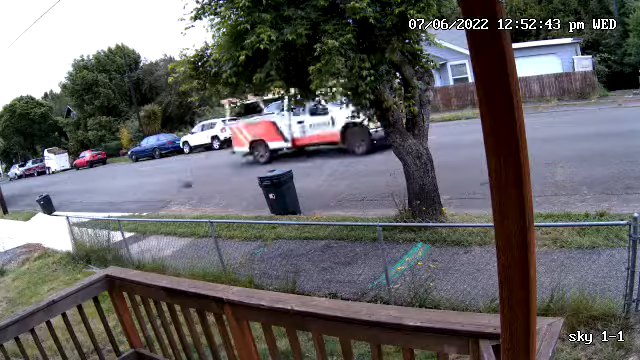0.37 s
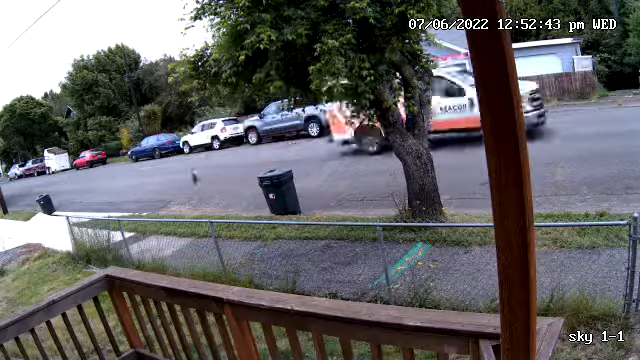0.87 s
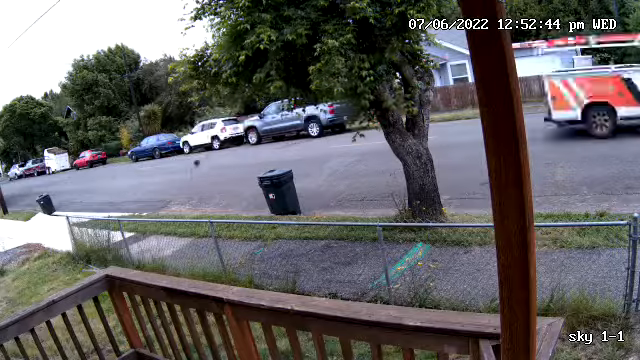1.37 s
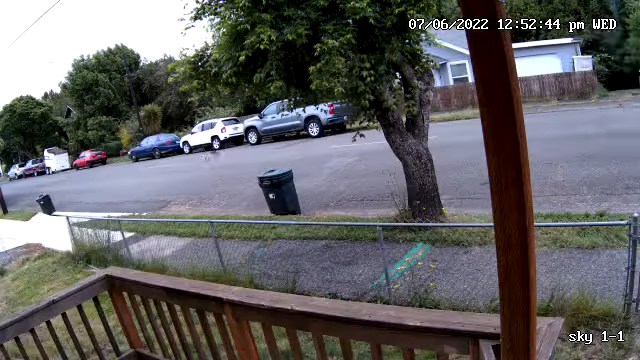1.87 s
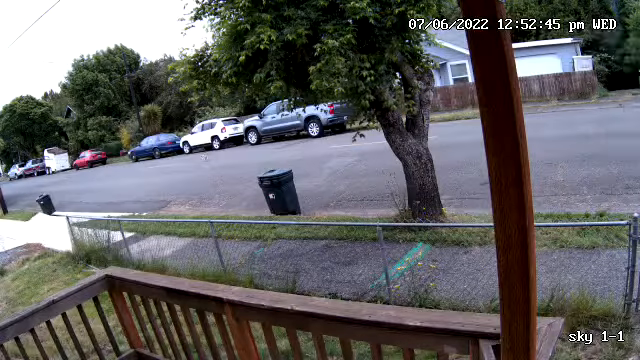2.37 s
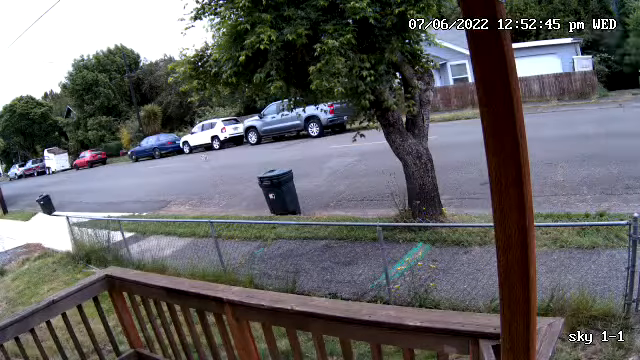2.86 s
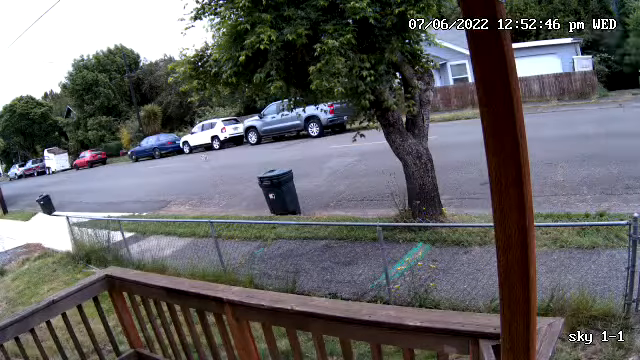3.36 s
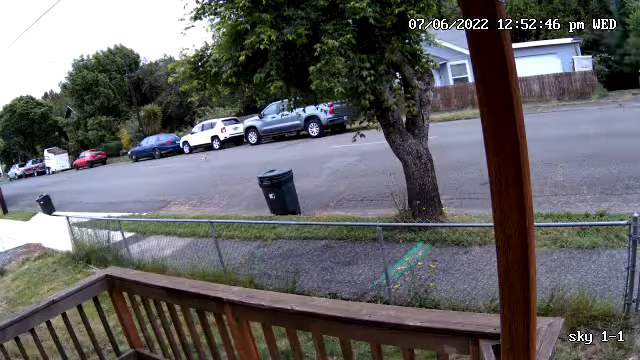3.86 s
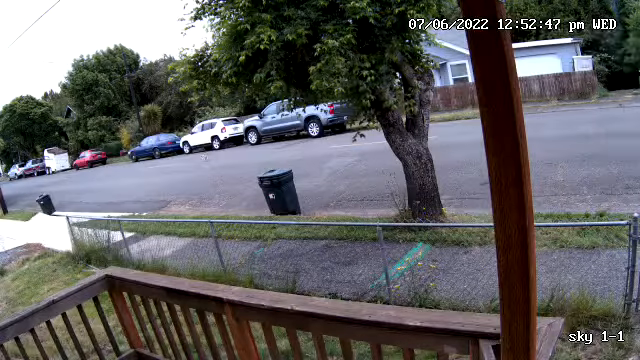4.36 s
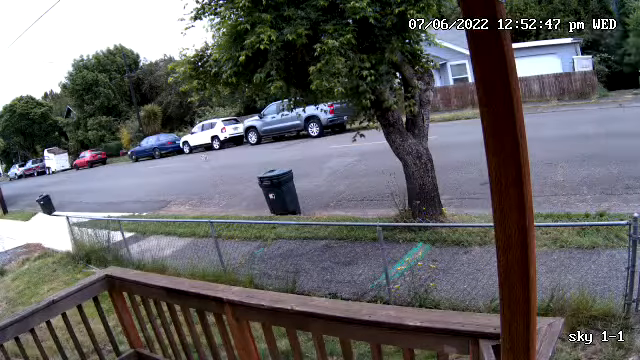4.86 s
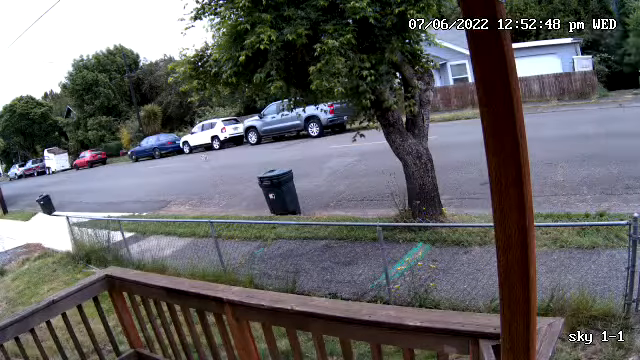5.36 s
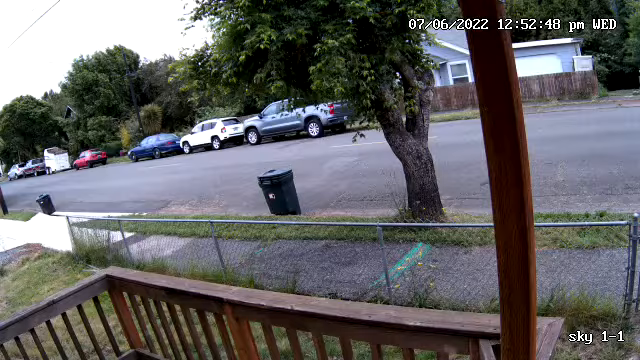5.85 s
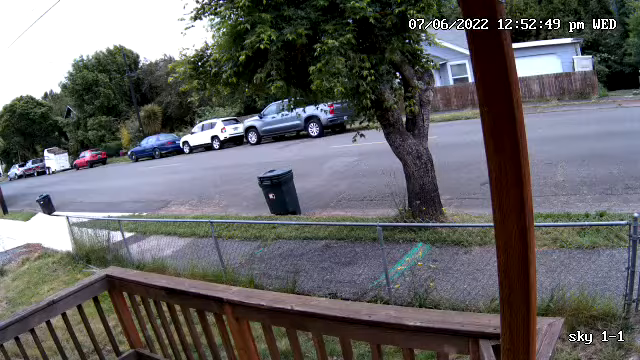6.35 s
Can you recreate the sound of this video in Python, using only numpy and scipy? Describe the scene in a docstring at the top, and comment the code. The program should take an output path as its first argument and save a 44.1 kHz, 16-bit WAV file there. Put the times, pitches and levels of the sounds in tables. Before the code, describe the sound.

Heard from a porch through a small microphone with limited treble: a loaded pickup already close, its tyres making a hollow, fluttering roar with airy hiss over a low engine throb. Light metallic rattles come first, then soft bassy thumps. The exhaust hum becomes strongest after the truck goes by, then tyres recede, a few ticks and one faint thump follow, and the engine revs gently upward as it leaves.

```python
"""A heavy pickup truck with an eight-cylinder engine rolls past a porch on a quiet street and drives off.
From the start its exhaust throbs in low harmonics, panels and pipe add filtered noise, and tyres roar and
hiss, combed by a ground echo and coloured by porch echoes, over a faint steady hum. Soon the load rattles in
short noise bursts, then the wheels thump over seams as brief sines; from about the middle the tyres fade and
the engine speed climbs, with more rattles and a late thump. A small 16 kHz microphone listens."""
import sys
import numpy as np
from scipy import signal
from scipy.fft import rfft, irfft, next_fast_len
from scipy.io import wavfile

SR = 44100
rng = np.random.default_rng(int(sys.argv[2]) if len(sys.argv) > 2 else 0)


def materialize(psi):
    """Save the field psi as 16-bit PCM at rate SR to the path in sys.argv[1].

    A 1-D psi becomes a single channel; in a 2-D psi each row is a channel.
    """
    bounded = np.clip(np.atleast_2d(psi).T, -1, 1)
    quanta = np.round(bounded * 32767).astype(np.int16)
    wavfile.write(sys.argv[1], SR, quanta)


def voltage_ratio(level):
    """Linear amplitude factor for a level in decibels (scalar or array-like)."""
    return 10 ** (np.asarray(level, float) / 20)


N = 286764  # samples, 6.5 s


def rms_one(x):
    """Normalisation: divide a signal by its root mean square."""
    return x / np.sqrt(np.mean(x ** 2) + 1e-20)


def in_time(rows):
    """Linear interpolation: each column after the time becomes a curve over all samples."""
    time_s, *columns = np.transpose(rows)
    return [np.interp(np.arange(N) / SR, time_s, column) for column in columns]


def drift(rate_hz):
    """Low-passed random process: two equal poles at rate_hz leave a slow wander of spread 1."""
    step = 40  # samples between the computed points
    pole = np.exp(-2 * np.pi * rate_hz * step / SR)
    settle = 2000  # points dropped while the filter settles
    white = rng.standard_normal(N // step + settle + 2)
    slow = signal.lfilter([1], [1, -2 * pole, pole * pole], white)[settle:]
    return np.interp(np.arange(N) / step, np.arange(len(slow)), rms_one(slow - slow.mean()))


def coloured(spectrum, patchy_db, rate_hz):
    """Spectral shaping: white noise in third-octave bands, each wavering on its own; rms 1."""
    hz, db = np.transpose(spectrum)
    size = next_fast_len(N)
    octaves = np.log2(np.fft.rfftfreq(size, 1 / SR) + 1)
    gain = voltage_ratio(np.interp(octaves, np.log2(hz), db, left=-99, right=-99))
    shaped = rfft(rng.standard_normal(size)) * gain
    out = 0
    for centre in np.arange(3, 13.4, 1 / 3):
        if np.log2(hz[0]) - .4 < centre < np.log2(hz[-1]) + .4:
            window = np.clip(1 - 3 * abs(octaves - centre), 0, 1)  # triangles that overlap to 1
            band = irfft(shaped * window, size)[:N]
            out = out + band * voltage_ratio(patchy_db * drift(rate_hz))
    return rms_one(out)


def resonate(x, hz, width_hz):
    """Damped resonator: a pole pair whose damping sets the bandwidth; gain 1 on top."""
    r = np.exp(-np.pi * width_hz / SR)
    numerator = [(1 - r * r) / 2, 0, (r * r - 1) / 2]
    return signal.lfilter(numerator, [1, -2 * r * np.cos(2 * np.pi * hz / SR), r * r], x)


def resonate_twice(x, hz, width_hz):
    """Cascaded resonators: two equal ones in series steepen both skirts."""
    return resonate(resonate(x, hz, width_hz), hz, width_hz)


# Engine speed: time_s [s], firing_hz [Hz]
FIRING_RATE = [(0, 70.2), (.45, 71.0), (1.25, 70.4), (2.6, 68.8), (4.0, 70.2), (6.5, 74.3)]
# Strong exhaust tones: time_s [s], order_5_db, order_8_db, order_11_db [dB rms]
STRONG_ORDERS = [(0, -34, -36.5, -58), (.27, -44.5, -36.5, -47), (.5, -31.5, -32, -56.5),
                 (1.25, -30, -29, -40.5), (1.5, -28, -33, -58), (1.75, -27, -34, -38),
                 (2.2, -22.5, -25.5, -34.5), (2.5, -25, -24, -37), (3.45, -28.5, -24, -37),
                 (4.25, -31.5, -30, -45), (4.5, -37.5, -32, -50.5), (5.0, -37, -32.5, -56.5),
                 (5.5, -35, -41.5, -58), (6.0, -34.5, -32.5, -65), (6.25, -36.5, -31, -56),
                 (6.5, -29, -32.5, -51.5)]
# Weak orders from uneven cylinder banks: order [per engine cycle],
# level_db [dB relative to the mean dB level of orders 5 and 8]
WEAK_BANK_ORDERS = [(3, -28), (4, -19.5), (6, -28.5), (7, -11), (9, -17), (10, -18), (13, -34.5)]


def exhaust():
    """Harmonic series: pulses repeating each engine cycle of eight firings sound as its whole orders."""
    firing_hz, = in_time(FIRING_RATE)
    fifth_db, eighth_db, eleventh_db = in_time(STRONG_ORDERS)
    cycle_phase = 2 * np.pi * np.cumsum(firing_hz) / SR / 8
    levels = [(5, fifth_db), (8, eighth_db), (11, eleventh_db)]
    mean_db = (fifth_db + eighth_db) / 2
    for order, db in WEAK_BANK_ORDERS:
        levels.append((round(order), mean_db + db + 1.5 * drift(1.5)))
    start_phases = rng.uniform(0, 2 * np.pi, len(levels))
    out = 0
    for (order, db), phase in zip(levels, start_phases):
        out = out + voltage_ratio(db + 0.72 * drift(14)) * np.sin(order * cycle_phase + phase)
    return np.sqrt(2) * out


# Low noise of the passing truck: time_s [s], shudder_db [dB rms], rasp_db [dB rms]
BODY_LEVELS = [(0, -35, -36.5), (.5, -35.5, -33.5), (.8, -36, -37), (1.25, -31, -36), (1.6, -35.5, -35),
               (2.0, -30.5, -35), (2.6, -33, -36.5), (3.1, -38, -32), (3.7, -38.5, -35.5),
               (4.05, -40.5, -32), (4.6, -45, -37.5), (5.0, -51, -35), (5.5, -41.5, -37.5), (6.5, -53, -42)]
# Panel shudder spectrum: pitch_hz [Hz], density_db [relative dB per Hz]
SHUDDER_SPECTRUM = [(12, -20), (24, -7), (35, -4), (55, -4), (80, -6), (100, -27.5)]
# Panel boom spectrum: pitch_hz [Hz], density_db [relative dB per Hz]
BOOM_SPECTRUM = [(80, -25), (100, -4), (135, 0), (170, -8), (250, -30)]
# Exhaust pipe rasp spectrum: pitch_hz [Hz], density_db [relative dB per Hz]
RASP_SPECTRUM = [(110, -25), (160, -4), (210, 0), (255, -3), (330, -14), (450, -30)]


def body():
    """Broadband radiation: panels shudder and boom, the exhaust pipe rasps, each as coloured noise."""
    shudder_db, rasp_db = in_time(BODY_LEVELS)
    boom_db = shudder_db - 1.5
    out = voltage_ratio(shudder_db) * coloured(SHUDDER_SPECTRUM, patchy_db=1.0, rate_hz=5.0)
    out += voltage_ratio(boom_db) * coloured(BOOM_SPECTRUM, patchy_db=2.5, rate_hz=6.8)
    return out + voltage_ratio(rasp_db) * coloured(RASP_SPECTRUM, patchy_db=2.0, rate_hz=4.6)


def ground_echo(x, lag_ms, strength):
    """Comb interference: a dulled, delayed copy off the ground alternately adds and cancels."""
    echo = np.interp(np.arange(N) - lag_ms * SR / 1000, np.arange(N), x)
    # the soft verge returns only the lower part, below about 1900 Hz
    echo = signal.filtfilt(*signal.butter(2, 1900, fs=SR), echo)
    return (x + strength * echo) / np.sqrt(1 + strength ** 2)


# Tyres: time_s [s], roar_db [reference dB for the resonances], hiss_db [dB],
# lag_ms [ground echo, ms; longest when the truck is nearest], strength [ground echo, 0-1]
TYRE_LEVELS = [(0, -31, -46.5, 0.84, 0.51), (.5, -32.5, -43.5, 0.94, 0.46), (1.0, -35, -44, 1.11, 0.39),
               (1.4, -33.5, -45, 1.47, 0.1), (1.75, -33.5, -43, 1.43, 0.4), (2.05, -33.5, -44.5, 1.7, 0.5),
               (2.3, -33.5, -46, 1.63, 0.5), (2.6, -33, -47, 1.5, 0.23), (3.1, -35, -51.5, 1.03, 0.29),
               (3.6, -38, -52.5, 0.94, 0.36), (4.1, -39, -53.5, 0.85, 0.13), (4.6, -39, -55, 0.52, 0.24),
               (5.2, -42, -55, 0.53, 0.24), (5.9, -44, -58, 0.41, 0.01), (6.5, -46.5, -62, 0.23, 0)]
# Tread hiss spectrum: pitch_hz [Hz], density_db [relative dB per Hz]
HISS_SPECTRUM = [(1200, -21.5), (1900, 0.5), (2500, -3), (3500, -2), (5000, -6.5), (6500, -13),
                 (8000, -15.5)]
# Resonances of tyre cavity, tread grooves and gap to the road:
# pitch_hz [Hz], width_hz [each of two passes, Hz], level_db [dB relative to roar_db]
TYRE_RESONANCES = [(357, 286, -9), (554, 220, -8), (703, 207, -5), (919, 208, -6.5), (1136, 360, -8.5),
                   (1550, 345, -12), (2340, 1160, -15)]
# Swells on top of the roar: time_s [s], ring_db [near 920 Hz, dB], upper_db [near 1560 Hz, dB],
# swash_db [near 2400 Hz, dB]
RESONANCE_SWELLS = [(0, 3.5, 2.5, -2.5), (.5, 5, 2, -7.5), (1.0, 6.5, 4.5, -5), (1.4, 4.5, 2.5, -4.5),
                    (2.05, 2, 2, 3.5), (2.6, 4.5, 0.5, -0.5), (3.25, 2.5, 1, 2.5), (3.7, -2.5, -5.5, -0.5),
                    (4.3, -0.5, -1.5, 0), (5.1, 3.5, 1, -5), (5.85, -4, 1, -3), (6.5, -7, -6, 0.5)]


def rolling():
    """Resonant filtering: road roughness excites tyre resonances as roar, with coloured hiss above."""
    roar_db, hiss_db, lag_ms, strength = in_time(TYRE_LEVELS)
    out = voltage_ratio(hiss_db + 0.19 * drift(10)) * coloured(HISS_SPECTRUM, patchy_db=1.5, rate_hz=3.6)
    ring_db, upper_db, swash_db = in_time(RESONANCE_SWELLS)
    swells = [0, 0, 0, ring_db, 0, upper_db, swash_db]
    for (hz, width_hz, db), swell_db in zip(TYRE_RESONANCES, swells):
        band = resonate_twice(rng.standard_normal(N), hz, width_hz)
        fluttering = rms_one(voltage_ratio(2.0 * drift(12.5)) * band)  # the rough road makes each band flutter
        out += voltage_ratio(roar_db + db + swell_db) * fluttering
    return ground_echo(out, lag_ms, np.clip(strength, 0, 1))


# Echoes off railing, post and wall: lag_ms [mean, ms], level_db [mean, dB relative to the direct sound]
PORCH_ECHOES = [(2.2, -17), (4.9, -15), (7.5, -13), (11.2, -17)]


def porch(x):
    """Early reflection: railing, post and wall return copies that swell and shift as the truck moves."""
    out, power = x.copy(), 1
    for lag_ms, db in PORCH_ECHOES:
        gain = voltage_ratio(db + 1.8 * drift(0.43))
        lag = lag_ms * (1 + .04 * drift(.25)) * SR / 1000
        out += gain * np.interp(np.arange(N) - lag, np.arange(N), x)
        power = power + gain ** 2
    return out / np.sqrt(power)


def far_hum():
    """Pure tone: a faint low sine of the neighbourhood, with slow amplitude modulation."""
    hum_hz, hum_db = 31.2, -43
    tone = np.sin(2 * np.pi * hum_hz * np.arange(N) / SR)
    return np.sqrt(2) * voltage_ratio(hum_db + 1.5 * drift(1.2)) * tone


# Rattles of the load: start_s [s], level_db [nominal peak before echoes, twice the noise rms, dB],
# pitch_hz [centre, Hz], width_hz [each of two passes, Hz], length_s [s]
LOAD_RATTLES = [(0.458, -32, 3870, 2040, 0.0022), (0.569, -35.5, 4300, 2500, 0.022),
                (0.608, -41, 5000, 3000, 0.0074), (0.652, -44.5, 7000, 1520, 0.0034),
                (0.814, -48, 3900, 794, 0.0059), (1.204, -39, 4870, 1190, 0.0089),
                (3.201, -38, 2800, 1500, 0.008), (3.935, -40, 4720, 300, 0.0064),
                (4.126, -48, 2860, 497, 0.045), (4.197, -39, 2500, 1480, 0.0045),
                (4.303, -45, 3940, 3000, 0.0046), (4.371, -38.5, 2830, 1190, 0.011),
                (4.368, -45, 5000, 2500, 0.0041)]


def rattles():
    """Impact excitation: contacts ring loose metal, as noise bursts with Gaussian rise, exponential fall."""
    t, out = np.arange(N) / SR, np.zeros(N)
    for start_s, db, hz, width_hz, length_s in LOAD_RATTLES:
        near = slice(int((start_s - .1) * SR), int((start_s + .2) * SR))
        late = (t[near] - start_s) / length_s
        shape = np.exp(np.where(late < 0, -late ** 2, -late / 0.73))
        ringing = rms_one(resonate_twice(rng.standard_normal(len(late)), hz, width_hz))
        out[near] += voltage_ratio(db) / 2 * shape * ringing
    return out


# Wheels over road seams: centre_s [s], level_db [envelope peak, dB], pitch_hz [Hz],
# length_s [half-width of the envelope at 1/e, s]
SEAM_THUMPS = [(1.31, -19, 60, .04), (1.36, -24, 30, .05), (2.05, -22, 54, .06), (2.03, -27, 128, .05),
               (1.23, -28, 245, .035), (4.05, -30, 232, .06)]


def thumps():
    """Transient vibration: each seam rocks the body, as a sine under a Gaussian envelope."""
    t, out = np.arange(N) / SR, np.zeros(N)
    for centre_s, db, hz, length_s in SEAM_THUMPS:
        late_s = t - centre_s
        out += voltage_ratio(db) * np.exp(-(late_s / length_s) ** 2) * np.sin(2 * np.pi * hz * late_s)
    return out


def scene():
    """Superposition: truck and street add in one channel; only tyres and rattles meet the porch."""
    low_parts = exhaust() + body() + thumps() + far_hum()
    return (low_parts + porch(rolling() + rattles()))[None]


def filtered(x, response):
    """Linear filtering: multiply the spectrum by a gain curve given as (Hz, dB) rows."""
    size = next_fast_len(N)
    hz = np.fft.rfftfreq(size, 1 / SR)
    gain = voltage_ratio(np.interp(hz, *np.transpose(response)))
    return irfft(rfft(x, size) * gain, size)[:, :N]


# Guard filter before the converter: pitch_hz [Hz], gain_db [dB]
GUARD_FILTER = [(7200, 0), (7700, -5), (7900, -11), (8000, -18), (8010, -120)]
# Smoothing filter after the converter: pitch_hz [Hz], gain_db [dB]
SMOOTHING_FILTER = [(7000, 0), (7700, -3), (8300, -11), (8700, -24), (9000, -38), (9300, -60),
                    (10000, -120)]


def low_rate_microphone(x):
    """Sampling theorem: a low rate cuts the top and leaves a faint mirror image just above half the rate."""
    rate_hz = 16000
    guarded = filtered(x, GUARD_FILTER)
    mirrored = guarded * (1 + 2 * np.cos(2 * np.pi * rate_hz * np.arange(N) / SR))
    return filtered(mirrored, SMOOTHING_FILTER)


def top_cut(x):
    """Nothing passes above the cut-off."""
    return signal.sosfilt(signal.butter(12, 8710, fs=SR, output="sos"), x)


def record(dry):
    """Signal chain: the mix of all sources passes the band-limited microphone."""
    finished = low_rate_microphone(dry)
    return top_cut(finished)


dry = scene()
out = record(dry)
materialize(out)
```